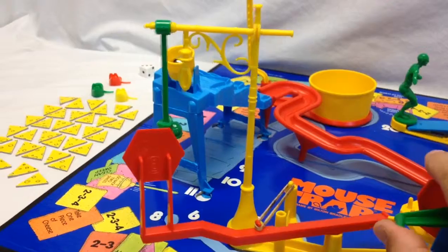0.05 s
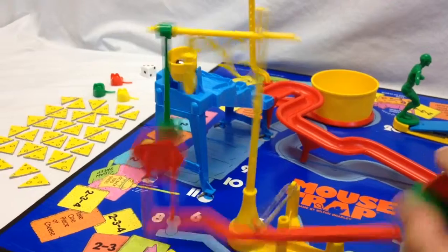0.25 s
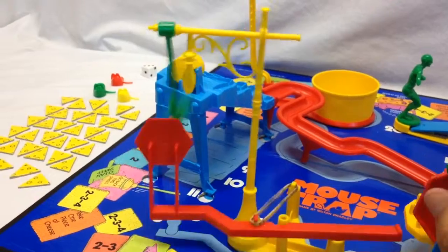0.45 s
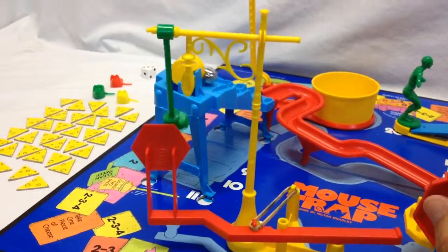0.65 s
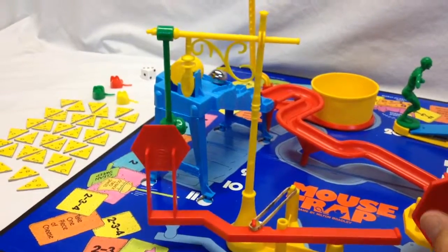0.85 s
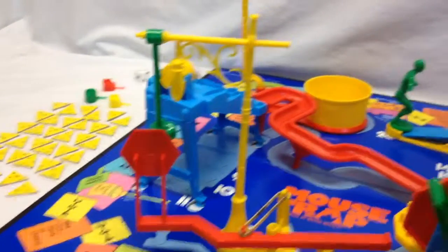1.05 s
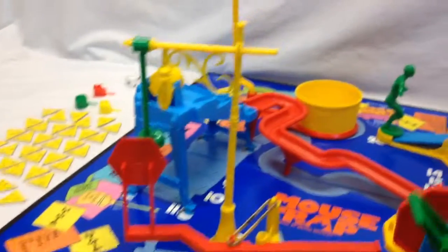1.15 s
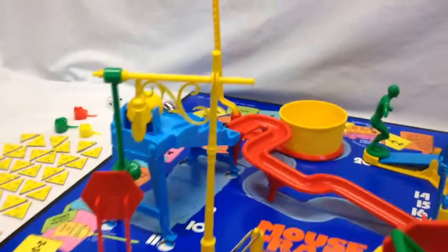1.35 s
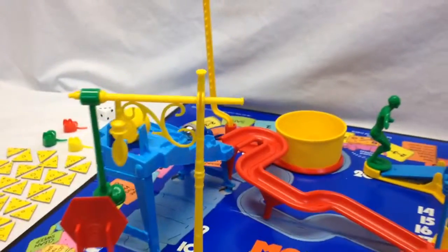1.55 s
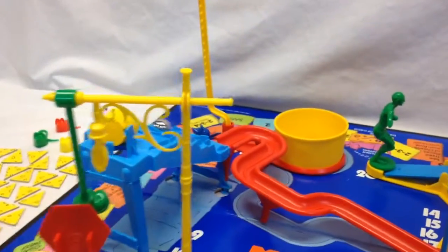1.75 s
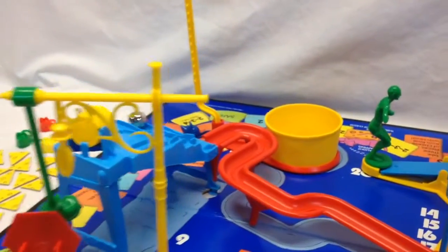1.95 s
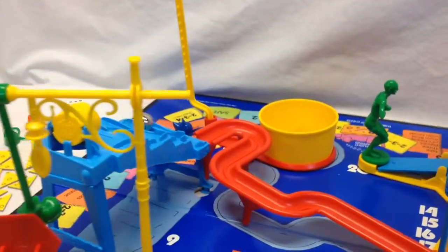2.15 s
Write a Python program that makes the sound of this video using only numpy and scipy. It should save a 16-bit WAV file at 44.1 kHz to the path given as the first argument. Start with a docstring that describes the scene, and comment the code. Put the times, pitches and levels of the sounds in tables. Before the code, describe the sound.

A plastic toy contraption clatters close by in a quiet room. At about 0.2 seconds its lever snaps with a cluster of sharp clacks, hits again near 0.4, and the frame rattles out by 0.7. A small steel ball then drops onto hollow plastic stairs and rolls with a faint rumble, knocking unevenly from step to step, loudest around 1.5 seconds and again near 1.9, with light taps until 2.2.

```python
"""A plastic toy contraption on a table, close by, in a quiet room.
First a lever is let go, snaps against its stop and rattles out, while the frame's loose joints chatter.
Then a small steel ball tips from a bucket and rolls and knocks down a hollow plastic staircase.
Each hit makes the plastic ring briefly; chatter and rolling are hundreds of tiny bumps a second."""
import sys
import numpy as np
from scipy import signal
from scipy.io import wavfile

SR = 44100
rng = np.random.default_rng(int(sys.argv[2]) if len(sys.argv) > 2 else 0)


def file_out(sig):
    """Save sig as 16-bit WAV at sys.argv[1]."""
    # one column per channel
    cols = np.atleast_2d(sig).T
    # limit, then scale
    lim = np.clip(cols, -1, 1)
    pcm = np.round(lim * 32767).astype(np.int16)
    wavfile.write(sys.argv[1], SR, pcm)


N = 97020


def amp(db):
    """Turns decibels (dB) into a number to multiply a sound by."""
    return 10 ** (np.asarray(db) / 20)


def unit(x):
    """Scales a sound to an average (rms) level of 1."""
    return x / np.sqrt(np.mean(x ** 2) + 1e-20)


def read(points, hz):
    """Looks up a frequency in a table, sliding between rows on a pitch scale."""
    row_hz, value = np.transpose(points)
    return np.interp(np.log(hz + 1), np.log(row_hz), value)


def add(mix, s, sound):
    """Mixes a sound in, starting at s seconds."""
    part = mix[round(s * SR):][:len(sound)]
    part += sound[:len(part)]


def colour(x, points, size=4096):
    """Shapes the tone of a sound without smearing it earlier in time."""
    hz = abs(np.fft.fftfreq(size, 1 / SR))
    log_gain = np.log(amp(read(points, hz)))
    taps = np.fft.ifft(np.exp(np.conj(signal.hilbert(log_gain)))).real[:size // 2]
    return signal.fftconvolve(x, taps)[:len(x)]


def fade(t, t60):
    """Dies away by 60 dB in t60 seconds, the fade time."""
    return np.exp(-np.log(1000) * t / t60)


def ring(t, hz, t60):
    """One fading note, first pushed in or out at random."""
    return rng.choice([-1, 1]) * np.sin(2 * np.pi * hz * t) * fade(t, t60)


def room_tone(level_db=-69):
    """The faint, steady, low noise of the room."""
    # Tone of the noise. Each row: frequency in Hz, level in dB.
    tone = [(70, -5.5), (160, 1.5), (600, -8), (1500, -10.5), (4000, -17.5), (15000, -23.5)]
    return amp(level_db) * unit(colour(rng.standard_normal(N), tone))


def strike(levels_db, thud_hz, spots, notes, tone, ringing, vary_db=1.03):
    """One hit rings the whole part, the struck spot and a low hollow note, a little differently each time."""
    # Edges of the thud, knock, click and tick ranges, in Hz.
    edges_hz = [110, 750, 4200, 10200, 17000]
    crowd_t60, notes_db, thud_db, thud_t60, spot_t60, contact_s, detune = ringing
    crack, crack_s, board_rise_s = 0.082, 0.00083, 0.0024
    t = np.arange(SR // 8) / SR
    first = round(.01 * SR)  # levels are scaled to a 10 ms hit
    onset = np.minimum(t / contact_s, 1)
    # The crowd: so many close notes that they blur into noise, strongest in the first instant.
    tint = [(hz, db + vary_db * rng.standard_normal()) for hz, db in tone]
    burst = rng.choice([-1., 1.], len(t)) * onset * fade(t, crowd_t60)
    crowd = colour(burst * (1 + crack * np.exp(-t / crack_s)), tint)
    clear = sum(amp(db + vary_db * rng.standard_normal())
                * ring(t, hz * (1 + detune * rng.standard_normal()), t60) for hz, db, t60 in notes)
    spot = sum(amp(db) * ring(t, hz, spot_t60) for hz, db in spots)
    shell = crowd / crowd[:first].std() + (amp(notes_db) * clear + 2 * spot) * onset
    thud = amp(thud_db) * ring(t, thud_hz, thud_t60)
    board = (shell + thud) * (1 - np.exp(-t / board_rise_s))  # the board takes up the thud slowly
    hit = np.zeros(len(t))
    for k, source in enumerate([board, shell, shell, shell]):
        band_filter = signal.butter(5, edges_hz[k:k + 2], "band", fs=SR, output="sos")
        band = signal.sosfilt(band_filter, source)
        hit += amp(levels_db[k]) * band / np.sqrt(np.sum(band ** 2) / first)
    return hit


def lever_clatter(knock_ring_db=-1, click_ring_db=0.5):
    """The lever snaps against its stop and shakes the frame."""
    # Lever and frame hits. Each row: start in seconds, thud, knock, click and tick levels in dB,
    # then thud, knock and click pitches in Hz.
    hits = [(0.22, -30.5, -36, -43, -45, 184, 3020, 5760), (0.2264, -27, -29, -28, -42, 372, 1006, 7060),
            (0.2416, -34, -27, -25.5, -21, 596, 1706, 6330), (0.2464, -42, -29, -21, -26, 384, 820, 7400),
            (0.2498, -38, -29.5, -16, -25, 250, 2970, 6400),
            (0.2645, -41, -32, -26.5, -40, 165, 3160, 8500),
            (0.2844, -39.5, -46, -41, -52, 500, 1630, 6400), (0.298, -39, -38, -30, -34.5, 180, 3500, 7740),
            (0.3027, -38.5, -34, -32.5, -42, 558, 1360, 6340),
            (0.32, -51, -41, -35.5, -48, 250, 1520, 6750),
            (0.3618, -46.5, -42, -37, -42.5, 560, 3050, 7560),
            (0.4177, -29, -26, -22.5, -38, 180, 1643, 7060),
            (0.4239, -39.5, -32, -32, -52, 523, 2080, 7350),
            (0.4623, -45.5, -39, -25.5, -40, 646, 3000, 8780),
            (0.473, -52, -36.5, -29, -41, 506, 3900, 8480), (0.4783, -47, -36, -27.5, -56, 349, 2720, 8560),
            (0.4854, -42, -40, -33, -56, 348, 2630, 6600), (0.4896, -34, -48, -36, -46, 168, 2940, 6700),
            (0.5155, -33.5, -35, -43, -54, 220, 1775, 6580),
            (0.5559, -36.5, -37, -39, -54, 184, 1425, 7060),
            (0.5871, -53, -42.5, -44.5, -80, 600, 2350, 7340),
            (0.6252, -51.5, -45.5, -49, -81, 556, 1775, 7300),
            (0.6503, -46.5, -49, -60, -85, 171, 2030, 6400),
            (0.6728, -41.5, -42, -34, -52, 682, 1570, 8110),
            (0.6838, -41.5, -34, -46, -64, 173, 1730, 7200)]
    # The lever's clear notes. Each row: pitch in Hz, level in dB, fade time in seconds.
    notes = [(542, -12, 0.068), (1597, -10, 0.06), (1998, -10.5, 0.04), (3100, -9, 0.025), (5920, -8, .055),
             (6780, -4.5, 0.041), (7240, -3.5, 0.049), (8600, -10.5, 0.046), (11800, -13.5, .03),
             (13800, -8.5, 0.015)]
    # Tone of its crowd of blurred notes. Each row: frequency in Hz, level in dB.
    tone = [(90, -23), (150, -1), (400, 0.5), (950, -6), (1600, 2), (3200, 1), (4200, -9), (5500, -9),
            (6200, 0), (8600, -1.5), (10300, -9.5), (12500, -6.5), (15200, -12)]
    # How it rings. In order: crowd fade time in seconds, clear note and thud levels in dB, thud fade,
    # spot fade and contact times in seconds, pitch change from hit to hit as a fraction.
    ringing = (0.037, -.5, .5, 0.048, 0.028, .0005, .007)
    out = np.zeros(N)
    for s, *levels_db, thud_hz, knock_hz, click_hz in hits:
        spots = [(knock_hz, knock_ring_db), (click_hz, click_ring_db)]
        add(out, s, strike(levels_db, thud_hz, spots, notes, tone, ringing))
    return out


def rattle(loudness, tone, bumps_per_s, ring_s, spread_db=3):
    """Many tiny random bumps, each briefly ringing one of six spots on the plastic."""
    bumps = (rng.random(N) < bumps_per_s / SR) * rng.choice([-1, 1], N)
    bumps = bumps * amp(spread_db * np.minimum(rng.exponential(1, N), 4))
    t = np.arange(SR // 20) / SR
    spot = rng.integers(0, 6, N)
    rung = np.zeros(N)
    for k in np.unique(spot):
        spot_ring = rng.standard_normal(len(t)) * fade(t, ring_s)
        rung += signal.fftconvolve(bumps * (spot == k), spot_ring)[:N]
    s, db = np.transpose(loudness)
    return unit(colour(rung, tone)) * np.interp(np.arange(N) / SR, s, amp(db), left=0, right=0)


def frame_chatter():
    """The frame's loose joints chatter as it sways."""
    # Strength of the chatter. Each row: time in seconds, level in dB.
    loudness = [(.21, -79), (.225, -45), (.28, -36.5), (.33, -39.5), (.35, -54), (.38, -40), (.41, -46),
                (.45, -48), (.49, -40), (.54, -57.5), (.62, -80), (.69, -52.5), (.73, -83)]
    # Tone of the frame. Each row: frequency in Hz, level in dB.
    tone = [(70, -36), (175, -1), (400, -8.5), (1000, -3), (1900, -1.5), (3100, -7.5), (4300, -16),
            (7000, -9.5), (10000, -26)]
    return rattle(loudness, tone, bumps_per_s=900, ring_s=0.054)


def ball_rolling():
    """The ball rumbles over tiny bumps in the plastic."""
    # Strength of the rolling. Each row: time in seconds, level in dB.
    loudness = [(.55, -55), (.78, -55), (.87, -64), (.99, -62), (1.05, -53), (1.2, -61), (1.32, -55.5),
                (1.36, -50), (1.44, -42.5), (1.5, -51.5), (1.63, -52), (1.71, -46), (1.76, -62),
                (1.84, -49), (2.01, -66), (2.04, -49), (2.08, -62), (2.15, -51), (2.2, -51)]
    # Tone of the rumble. Each row: frequency in Hz, level in dB.
    tone = [(40, -39), (95, -13.5), (150, 0), (200, 1), (300, -4), (430, -7), (560, -2.5), (900, -17),
            (1400, -11.5), (1900, -14.5), (2800, -19.5), (4000, -38), (6500, -27), (10500, -45.5)]
    return rattle(loudness, tone, bumps_per_s=830, ring_s=0.02)


def ball_knocks():
    """The ball drops from step to step; each step has its own notes."""
    # Hits on the stairs. Each row: start in seconds, thud, knock, click and tick levels in dB,
    # thud and knock pitches in Hz, relative strength of the knock's note in dB.
    hits = [(0.7291, -41, -37, -41, -57, 690, 2800, -5.5), (0.7659, -44, -32, -53, -61, 596, 1744, 4),
            (0.7712, -35.5, -29.5, -39.5, -63, 178.7, 1735, 2), (0.79, -42, -37, -43.5, -66, 570, 2040, 0),
            (1.0624, -42, -43.5, -56.5, -86.5, 175, 1570, -1.5),
            (1.0874, -38.5, -36.5, -49.5, -58, 552, 1860, -3), (1.1059, -37, -33, -50.5, -54, 196, 1740, 6),
            (1.1458, -40, -36, -41.5, -60, 197, 1610, 4.5),
            (1.2111, -32.5, -33.5, -34.5, -52, 183, 1327, -0.5),
            (1.2279, -37.5, -34, -40.5, -56, 562, 1920, -3), (1.2635, -40, -38, -42.5, -60, 537, 1272, 3),
            (1.3348, -51.5, -49.5, -59, -73, 570, 1420, 0), (1.4574, -34.5, -24, -38, -53, 689, 2196, 0.5),
            (1.5204, -35, -21.5, -37, -58, 535, 1410, 4),
            (1.5514, -30.5, -24.5, -36.5, -44, 564, 1278, 4.5),
            (1.5674, -40, -33, -42, -62, 184, 1500, -13),
            (1.651, -41.5, -42.5, -49.5, -81, 596, 2810, -0.5),
            (1.6925, -44, -43.5, -56, -69, 504, 1885, -8.5),
            (1.849, -35.5, -29.5, -47, -61.5, 546, 1360, 9.5),
            (1.8774, -42.5, -39, -48.5, -62, 173, 2075, -1), (1.9215, -33.5, -29.5, -35, -45, 573, 1366, 0),
            (1.9302, -39, -32.5, -43.5, -63, 160, 1480, 0), (1.9669, -37.5, -32, -42, -54, 547, 1370, 4),
            (2.1034, -45.5, -51.5, -60.5, -80, 561, 1394, 5.5),
            (2.1869, -50, -43, -58.5, -73, 549, 2020, -2.5)]
    # The staircase's clear notes. Each row: pitch in Hz, level in dB, fade time in seconds.
    notes = [(186, -9, 0.081), (569.5, -8.5, 0.055), (820, -15, 0.096), (1347, -5, 0.058),
             (1440, -7.5, .06), (1617, -5, 0.076), (1970, -7.5, 0.086), (2181, -6.5, 0.067),
             (4940, -12.5, 0.021), (6670, 0, 0.017)]
    # Tone of its crowd of blurred notes. Each row: frequency in Hz, level in dB.
    tone = [(95, -19), (150, 1), (500, -2), (980, -0.5), (1350, 7), (2200, 1), (2600, -3), (3500, -6.5),
            (4300, -20.5), (6500, -1.5), (8800, -9), (10500, -18.5), (13500, -11), (15200, -18)]
    # How it rings, with the same order and units as for the lever.
    ringing = (0.044, 1.84, 1.23, 0.054, 0.035, 0.00019, 0.0074)
    out = np.zeros(N)
    for s, *levels_db, thud_hz, knock_hz, ring_db in hits:
        add(out, s, strike(levels_db, thud_hz, [(knock_hz, ring_db)], notes, tone, ringing))
    return out


def room_echo(x, delay_s=.005):
    """A small furnished room sends back a short, blurred echo."""
    # How long the echo lasts. Each row: frequency in Hz, fade time in seconds.
    fade_times = [(150, 0.37), (500, 0.095), (1500, 0.15), (3000, 0.1), (14000, 0.11)]
    # How strong it is. Each row: frequency in Hz, level in dB.
    tone = [(150, -8), (500, -12), (1500, -13), (3000, -7.5), (7000, -17), (14000, -18.5)]
    hz, t, noise = signal.stft(rng.standard_normal(SR // 2), SR, nperseg=256)
    t60 = read(fade_times, hz)[:, None]
    gain = amp(read(tone, hz))[:, None] * np.sqrt(2 * np.log(1000) / (t60 * SR))
    tail = signal.istft(noise * fade(t, t60) * gain, SR, nperseg=256)[1]
    return signal.fftconvolve(x, np.r_[np.zeros(round(delay_s * SR)), tail])[:N]


def scene():
    """Lever, frame and ball in a quiet room."""
    toy = lever_clatter() + ball_knocks() + ball_rolling() + frame_chatter()
    return (toy + room_echo(toy) + room_tone())[None]


def record(dry, low_cut_hz=140, high_cut_hz=15350):
    """The microphone loses the deep bass, then the highest treble is cut off."""
    thin = signal.sosfilt(signal.butter(1, low_cut_hz, "high", fs=SR, output="sos"), dry)
    treble_cut = signal.firwin(255, high_cut_hz, window=("kaiser", 8), fs=SR)
    return signal.oaconvolve(thin, treble_cut[None], "same")


dry = scene()
out = record(dry)
file_out(out)
```